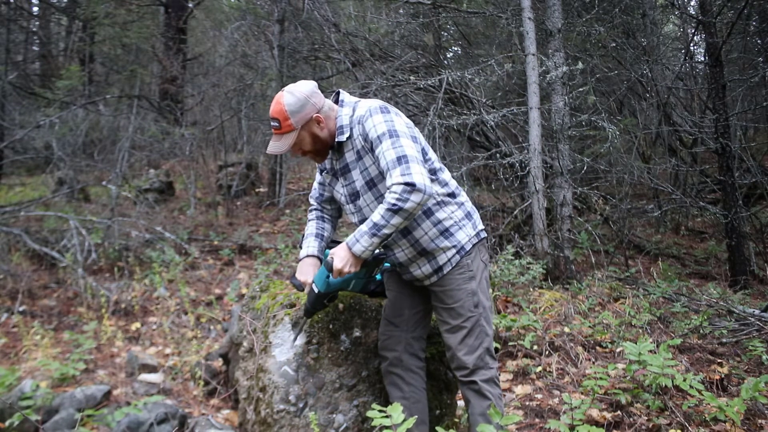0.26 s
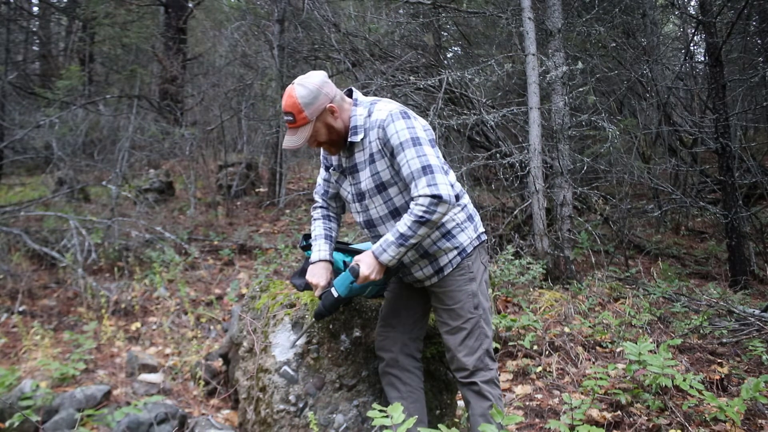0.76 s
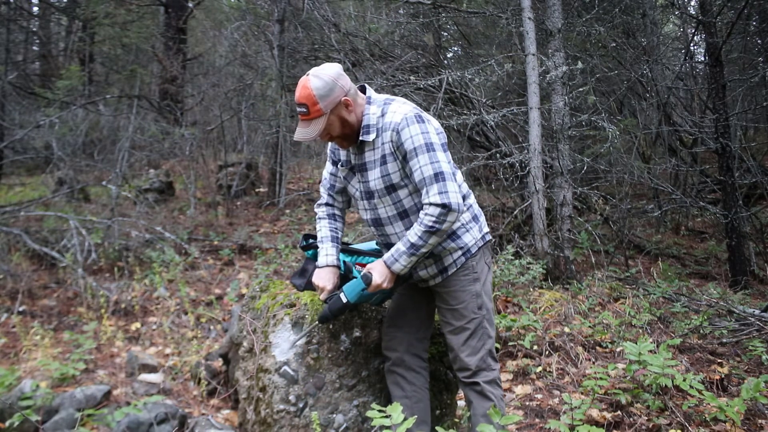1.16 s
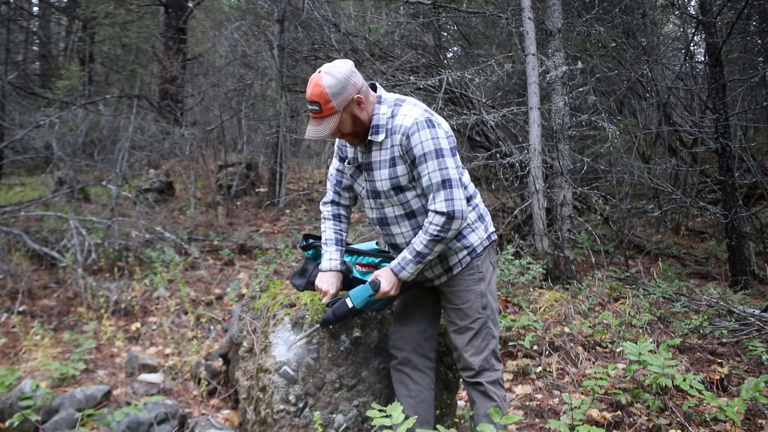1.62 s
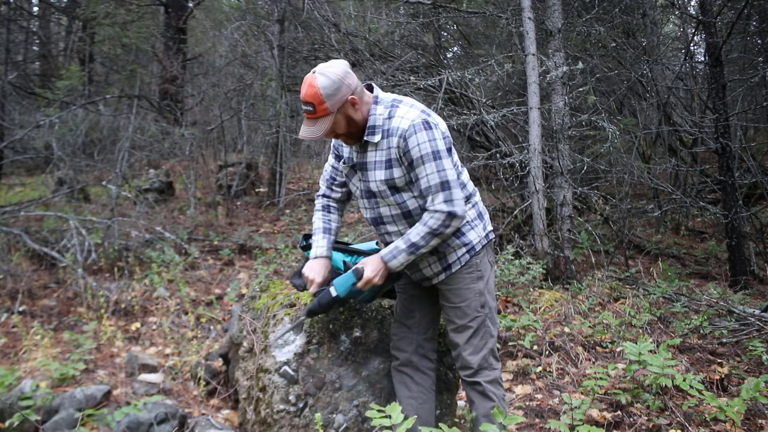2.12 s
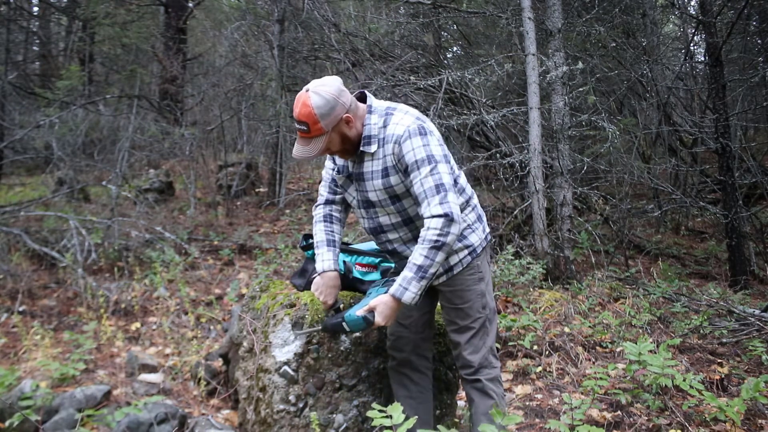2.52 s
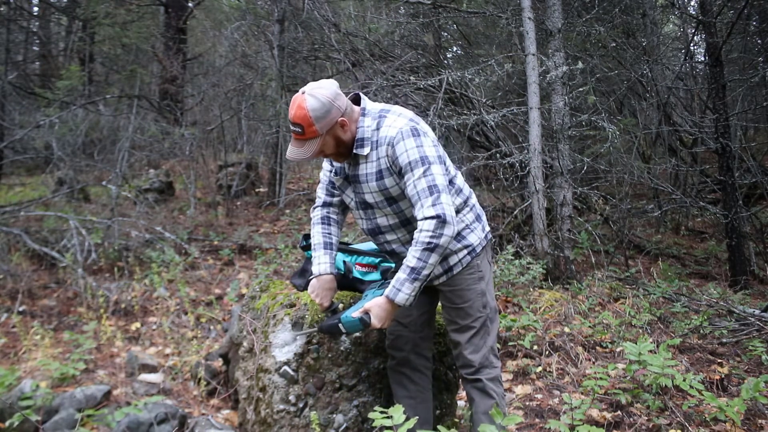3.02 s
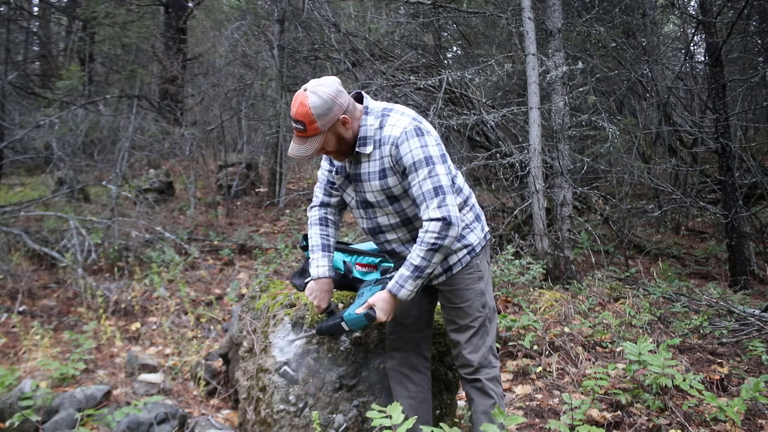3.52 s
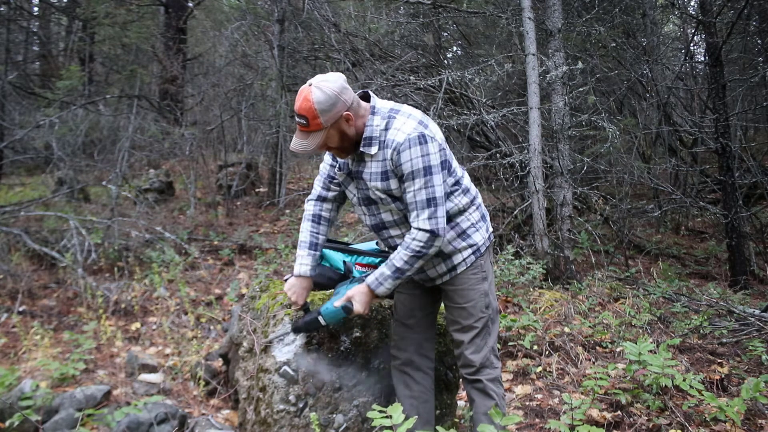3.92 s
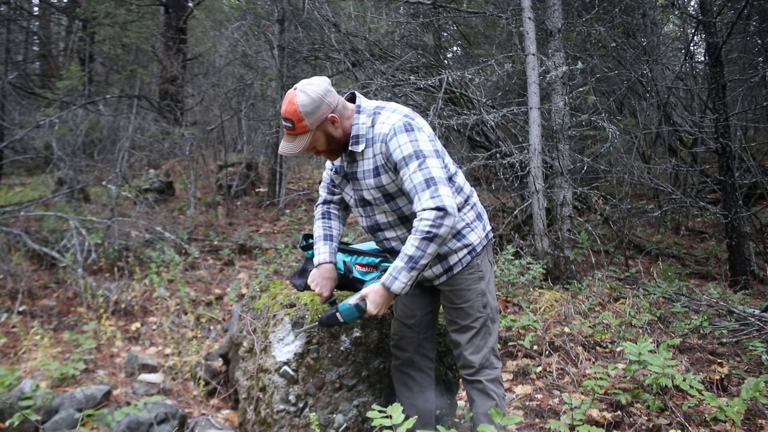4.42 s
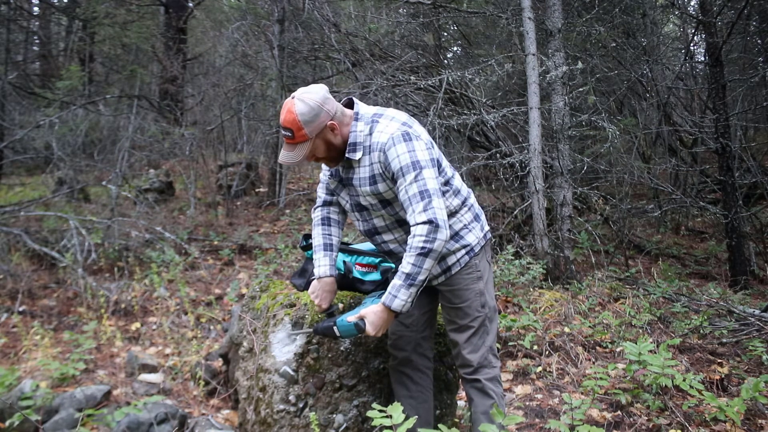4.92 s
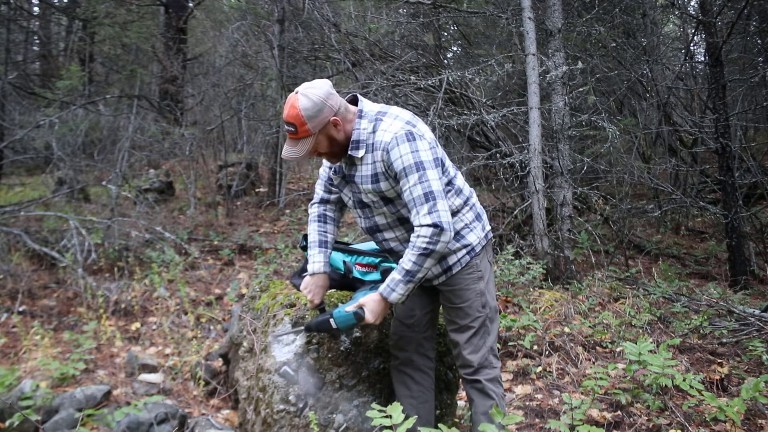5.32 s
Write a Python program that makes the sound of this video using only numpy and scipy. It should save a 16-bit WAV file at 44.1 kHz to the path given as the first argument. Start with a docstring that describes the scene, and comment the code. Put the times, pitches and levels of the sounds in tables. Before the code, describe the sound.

A cordless rotary hammer chisels old concrete in quiet woods, close to one microphone. From 0 to 1.8 s it hammers steadily, about 82 blows a second fused into a harsh buzzing rattle: housing knock strongest around 3 to 4 kHz, gritty concrete crack, thin steel ring, little deep bass. Chips snap off near the end; the freed motor races briefly and brakes by about 2.1 s. Until 2.8 s the bit taps the block, grit crunches softly and crumbs tick. The motor jerks and whines up at 2.75 to 2.9 s, and a rougher, less even burst runs 3.0 to 3.9 s, with skids and chip cracks. It brakes; taps and crumbs follow around 4.1 to 4.4 s. Spin-up with piston clatter from 4.4 s leads to a last burst, 4.8 to 5.4 s, then the motor runs down. A thin tree echo and faint steady air remain.

```python
"""A cordless rotary hammer chisels old concrete in the woods, close to the microphone, in three bursts.
A striker hits the pressed-home bit 82 times a second: blows thump the housing, crack the concrete, ring the steel.
After the first and second burst the motor brakes, the bit taps the block, grit crunches and crumbs fall.
Then the motor spins up again, its frame whining and its piston clattering twice a turn, and a burst follows.
Behind it all lie a thin echo from the trunks, further off, and still forest air, both made of shaped noise."""
import sys
import numpy as np
from scipy import signal
from scipy.fft import rfft, irfft
from scipy.io import wavfile

SR = 44100
rng = np.random.default_rng(int(sys.argv[2]) if len(sys.argv) > 2 else 0)


def waveform_to_disk(signal):
    """Save audio, clipped to [-1, 1], as 16-bit WAV at the path in sys.argv[1]."""
    frames = np.transpose(np.atleast_2d(signal))
    scaled = np.clip(frames, -1, 1) * 32767
    samples = np.round(scaled).astype(np.int16)
    wavfile.write(sys.argv[1], SR, samples)


N = 245195
T = np.arange(N) / SR

# spells of hammering: (first blow [s], last blow [s], blow rate [1/s], share of each blow that is new [0-1])
SPELLS = [(0.0058, 1.812, 82.06, .18), (3.0095, 3.868, 81.97, .42), (4.7897, 5.378, 81.95, .42)]
# colour of the tool's barrel: (frequency [Hz], level [dB])
BARREL = [(1500, -31), (2500, -25), (2850, -5), (3150, 0), (3400, 1.5), (3750, 4), (4000, -5), (4350, -25),
          (5500, -27.5)]
# ringing modes of the steel chisel: (frequency [Hz], width [Hz], level [dB])
STEEL_MODES = [(11400, 410, -2.5), (12060, 500, -5), (12810, 200, 6), (13250, 700, -4), (14300, 600, -3.5)]
# colour of contact with the concrete: (frequency [Hz], level [dB])
STONE = [(60, -58), (200, -14), (500, 0), (900, 2), (1700, 4.5), (3400, 4), (4500, -9.5), (8000, -15),
         (16000, -23)]


def gain_of(db):
    """Amplitude factor of a level in dB."""
    return 10 ** (np.asarray(db) / 20)


def evened(x):
    """Scales to rms 1."""
    return x / np.sqrt(np.mean(x ** 2) + 1e-20)


def read(points, hz):
    """A spectrum, joined on a log-frequency axis."""
    f, value = np.transpose(points)
    return np.interp(np.log(hz + 1), np.log(f + 1), value)


def curve(rows, column=1):
    """One column of a control table at every sample."""
    rows = np.asarray(rows)
    return np.interp(T, rows[:, 0], rows[:, column])


def add(mix, s, sound):
    """Mixes a sound in at time s."""
    part = mix[max(round(s * SR), 0):][:len(sound)]
    part += sound[:len(part)]


def colour(x, spectrum, size=2048):
    """Causal (minimum-phase) filter of unit energy with the given spectrum."""
    level_db = read(spectrum, abs(np.fft.fftfreq(size, 1 / SR)))
    log_gain = np.log(gain_of(np.maximum(level_db, -100)))
    response = np.fft.ifft(np.exp(np.conj(signal.hilbert(log_gain)))).real
    # if the energy lies in the second half, time runs backwards: turn it round
    if np.sum(response[:size // 2] ** 2) <= np.sum(response[size // 2:] ** 2):
        response = np.roll(response[::-1], 1)
    return signal.oaconvolve(x, response / np.linalg.norm(response))[:len(x)]


def ring(x, modes, size=2048):
    """Damped modes of unit total energy; a wider mode dies sooner."""
    t = np.arange(size) / SR
    response = sum(gain_of(db) * np.sqrt(width) * np.exp(-np.pi * width * t) * np.cos(2 * np.pi * hz * t)
                   for hz, width, db in modes)
    lowest_hz = np.min(np.asarray(modes)[:, 0])
    response = signal.sosfilt(signal.butter(2, lowest_hz / 2, "high", fs=SR, output="sos"), response)
    return signal.oaconvolve(x, response / np.linalg.norm(response))[:len(x)]


def resonate(x, hz, width):
    """A moving resonance: shifts the curve hz down to zero, smooths, and shifts back."""
    turn = np.exp(2j * np.pi * np.cumsum(hz) / SR)
    pole = np.exp(-np.pi * width / SR)
    smoothed = signal.lfilter([1], np.poly([pole, pole]), x / turn + 1e-18)  # two poles: steep skirts
    return (turn * smoothed).real


def waver(per_s):
    """Slow chance of rms 1, with per_s random knots a second."""
    knots = np.arange(N // 64) / per_s
    return evened(np.interp(T, knots, rng.standard_normal(len(knots))))


def burst(t, rise, decay):
    """A quick rise and an exponential fall."""
    t = np.maximum(t, 0)
    return (1 - np.exp(-(t / rise) ** 2)) * np.exp(-t / decay)


def blows(times, sizes, shape, fresh, memory, click=0):
    """A clean click, then a rattle that slowly drifts from blow to blow, plus a part that is new each time."""
    drift, new = rng.standard_normal((len(times), 2, len(shape))).swapaxes(0, 1)
    keep = np.exp(-1 / memory)  # memory in blows
    for k in range(1, len(times)):
        drift[k] = keep * drift[k - 1] + np.sqrt(1 - keep ** 2) * drift[k]
    fresh = np.clip(fresh, 0, 1)
    strike = click * np.linalg.norm(shape) * (np.arange(len(shape)) == np.argmax(shape))
    rattles = shape * (np.sqrt(1 - fresh) * drift + np.sqrt(fresh) * new) - strike
    # flattened to drive all frequencies about equally: the colour comes from what is shaken
    z = rfft(rattles, 2 * len(shape))
    rattles = irfft(z / (abs(z) + 1e-9) ** .7)[:, :len(shape)]
    out = np.zeros(N)
    for s, size, rattle in zip(times, sizes, rattles):
        add(out, s, size * rattle)
    return evened(out) * np.sqrt((times[-1] - times[0]) / T[-1])  # about rms 1 within the spell


def seating(spell):
    """0 while the bit is free, 1 while it is pressed home."""
    first, last = spell[:2]
    return np.clip(np.minimum(T - first + 0.022, last - T) / 0.036, 0, 1)


def thump(turns, orders, unsteady_db):
    """The low orders of the blow rate, radiated by housing and block; they crest just after each strike."""
    total = 0
    for order, db in orders:
        phase = 2 * np.pi * order * (turns - .07) + .7 * rng.standard_normal()
        total = total + gain_of(db + unsteady_db * waver(7)) * np.cos(phase)
    return evened(total)


def hammer(spell, force, spot, orders, size=900):
    """Striker on bit: the housing knocks and rebounds, the concrete cracks, the steel rings."""
    # the chisel springs loose and skids: (time [s], extra steel ring [dB], length [s], skid [0-1])
    slip_rows = [(1.785, 9, .03, 1), (3.27, 5, .03, .8), (3.54, 5, .022, .9), (3.79, 7, .045, .7),
                 (4.89, 5, .02, .4), (4.954, 12, .02, .4), (5.30, 13, .03, .8)]
    # colour of the casing: (frequency [Hz], level [dB])
    casing_spectrum = [(300, -48), (700, -25), (1300, -11), (1650, -3), (2000, -5), (2300, 2), (2550, -1),
                       (2720, 2), (3000, -5), (4000, -33.5)]
    # modes of the casing: (frequency [Hz], width [Hz], level [dB])
    casing_modes = [(1635, 110, 2.5), (1830, 150, -3), (2230, 130, -3), (2715, 100, -1)]
    # the seated bit's second resonance: (time [s], frequency [Hz], level [dB])
    lower_mode = [(.3, 2120, -5), (.45, 2330, -8), (.75, 2300, 0), (1.3, 2270, -2), (1.6, 2260, -7),
                  (3.1, 2380, -5)]
    # bright modes of the barrel: (frequency [Hz], width [Hz], level [dB])
    bright_modes = [(3790, 280, 0), (3600, 350, -7)]
    # colour of the cracking concrete: (frequency [Hz], level [dB])
    crack_spectrum = [(2500, -46), (4300, 3.5), (5500, -0.5), (6300, -1), (7300, -2.5), (8150, 1),
                      (9300, -9), (11300, -10.5), (14500, -17.5), (16000, -11)]
    # colour of the rumbling block: (frequency [Hz], level [dB])
    block_spectrum = [(100, -35.5), (300, -11.5), (600, -0.5), (1000, 0.5), (1500, -3), (2500, -32.5)]
    seat_width_hz = 330
    # the tip skids as it is pressed home and lifted: the block rumbles and the casing shakes more
    settle_s, lift_s, skid_tumble_db, skid_casing_db = .08, .06, 8, 0.8
    skid_jitter_s = .0012  # the striker loses its beat as the bit lifts
    skid_wobble, unsteady_db = .05, 4  # a loose tip shifts the thump's timing [cycles], varies its orders [dB]

    first, last, rate, fresh = spell
    casing_db, thump_db, tumble_db = spot
    beats, t = np.arange(first, last, 1 / rate), np.arange(size) / SR
    strength, bite, seat, flight = rng.standard_normal((4, len(beats)))

    slips = [(db, share, np.exp(-((T - s) / length) ** 2)) for s, db, length, share in slip_rows]
    loose_db = sum(db * slip for db, _, slip in slips)
    slipping = sum(share * slip for _, share, slip in slips)
    settling = np.exp(-abs(T - first) / settle_s)
    skid = np.clip(2 * fresh * settling + np.exp(-abs(T - last) / lift_s) + slipping, 0, 1)

    # load makes the crank sag, lag and catch up, and the striker's flight time varies a little
    lag = fresh * (.0007 * waver(11) - .004 * settling)
    jitter_s = .0002 * fresh + skid_jitter_s * np.exp((beats - last) / lift_s)
    times = beats + np.interp(beats, T, lag) + jitter_s * flight
    sizes = gain_of(2.8 * fresh * strength)

    # the piston turns round half a cycle after the strike
    rebound = burst(t - .5 / rate, 0.00071, 0.0019)
    knock = burst(t, .00045, .0013) + .11 * burst(t, .002, .012) + (.1 + .3 * fresh) * rebound
    snap = burst(t, .0003, 0.00092) + 0.207 * burst(t, 0.00085, 0.018) + 0.023 * rebound
    ping = burst(t, 0.00064, 0.0035) + 0.048 * burst(t, .001, 0.0057)

    shake = blows(times, sizes, knock, fresh, memory=35, click=.45)
    casing = gain_of(-4.0) * colour(shake, casing_spectrum) + gain_of(-9.0) * ring(shake, casing_modes)

    jolt = blows(times, sizes, knock, fresh, memory=46, click=0.25)
    upper = resonate(jolt, curve(force, 3), seat_width_hz)
    lower = gain_of(curve(lower_mode, 2)) * resonate(jolt, curve(lower_mode), seat_width_hz)
    rattle = blows(times, sizes, knock, fresh, memory=35, click=.6)
    seated = np.std(rattle) * evened(upper + lower)
    barrel = gain_of(-2.6) * colour(rattle, BARREL) + gain_of(-4.0) * seated

    bright = blows(times, sizes, knock, fresh, memory=30, click=.6)
    bright = colour(ring(bright, bright_modes), BARREL)
    bright *= np.std(rattle) / np.std(bright)

    crack = blows(times, sizes * gain_of(1.4 * bite), snap, 2 * fresh, memory=17, click=0.35)
    crack = colour(crack, crack_spectrum)
    steel = blows(times, gain_of((2 + 4 * fresh) * seat), ping, fresh, memory=9, click=.6)
    steel = ring(steel, STEEL_MODES)

    tumble = blows(times, sizes, knock, fresh=1, memory=60, click=.2)
    tumble = gain_of(tumble_db + skid_tumble_db * skid) * np.sqrt(fresh) * colour(tumble, block_spectrum)
    turns = rate * (T - first - lag) + skid_wobble * (skid + fresh ** 2) * waver(35)
    steady = seating(spell) * (1 - .8 * skid) * thump(turns, orders, 1 + unsteady_db * fresh)
    body = gain_of(thump_db) * steady + tumble

    # the housing follows the force, the crack the bite, the bright ring its own level
    housing = gain_of(casing_db + skid_casing_db * skid) * casing + gain_of(-2.3) * barrel
    return (gain_of(curve(force)) * housing
            + gain_of(0.5 + curve(force, 2)) * crack
            + gain_of(curve(force, 4)) * body
            + gain_of(-2.8 + curve(force, 5)) * bright
            + gain_of(curve(force, 6) + loose_db) * steel)


def chips(size=1500):
    """A harder crack where a piece of concrete gives way: one snap over a spray of splinters."""
    # blows that break off a chip: (time [s], level [dB])
    chip_rows = [(1.723, -5), (1.785, -9), (1.861, -7), (1.869, 1), (3.044, -2), (3.241, -6), (3.266, -1),
                 (3.534, -2), (3.765, -8), (3.790, -8), (4.788, -5), (4.80, -5), (4.826, -5), (4.849, -2),
                 (5.253, -5)]
    # colour of a breaking chip: (frequency [Hz], level [dB])
    chip_spectrum = [(150, -35), (500, -11), (1200, -4), (2000, 2), (2700, 3), (3800, 1), (5000, -7),
                     (8000, -14), (16000, -22)]
    snap_db = 7  # the snap, against its splinters
    t, out = np.arange(size) / SR, np.zeros(N)
    for s, db in chip_rows:
        add(out, s + .0012, gain_of(db) * burst(t, .0004, .0013) * rng.standard_normal(size))
        add(out, s + .0016, gain_of([db + snap_db]))  # a single-sample click
    concrete = gain_of(-9.0) * colour(out, chip_spectrum)
    return concrete + gain_of(-15) * colour(out, BARREL) + gain_of(-23.0) * ring(out, STEEL_MODES)


def drive():
    """Crank speed, gear level and share of rubbing: the motor overshoots, settles, races on lifting and brakes."""
    # pulls of the trigger: (pulled [s], released [s], running level [dB], change while hammering [dB],
    # gear rub while braking [0-1])
    runs = [(-1.0, 1.94, -26.0, -10, .05), (2.746, 3.88, -25.7, -4.3, .5), (4.406, 5.408, -25.0, -4.3, .03)]
    crank_hz = 82
    spin_up_s, overshoot, overshoot_s, brake_s = .14, .06, .1, .135
    clatter_ends_s, clatter_fade_s = .1, .03  # after the release the piston soon stops clacking
    lift_race, race_rise_s, race_s = .13, .025, .065  # freed of its load, the motor races for a moment
    # gear noise grows with speed, and with the starting torque
    louder_db_per_decade, surge_db, surge_s = 88, 3.8, .35

    speed, level, rubbing = np.zeros((3, N))
    load = sum(seating(spell) for spell in SPELLS)
    race = 1 + lift_race * sum(burst(T - spell[1], race_rise_s, race_s) for spell in SPELLS)
    for pulled, released, db, load_db, brake_rub in runs:
        running, braking = np.maximum(T - pulled - spin_up_s, 0), np.maximum(T - released, 0)
        pace = np.clip((T - pulled) / spin_up_s, 0, 1) * (1 + overshoot * np.exp(-running / overshoot_s))
        brake = np.clip(1 - (braking / brake_s) ** 2, 0, 1)
        engaged = np.clip((clatter_ends_s - braking) / clatter_fade_s, 0, 1) ** 2
        speed += crank_hz * pace * brake * race
        gear_db = db + surge_db * np.exp(-running / surge_s) + load_db * load
        level += pace ** (louder_db_per_decade / 20) * brake * engaged * gain_of(gear_db)
        starting_rub = np.clip((.94 - pace) / .29, 0, 1)
        stopping_rub = brake_rub * np.minimum(4 * (1 - brake), 1)
        rubbing += (pace * engaged > 0) * (starting_rub + stopping_rub)
    return speed, level, np.clip(rubbing, 0, 1)


def hum(speed, torque_db):
    """Clean tones of the turning crank and gears; the mesh sings under high torque."""
    # tones of the running gear: (multiple of the crank rate, level [dB])
    tones = [(3, -16), (4, -4), (5, -6), (6, 1), (7, 0), (8, -4), (9, -6), (11, -5), (13, -2), (18, 2),
             (20, 4), (21, 3), (27, 3), (31, 5)]
    mesh_order, mesh_db, mesh_per_torque = 10, -25, 1.4  # multiple of the crank rate, dB, dB per dB
    turns = np.cumsum(speed * (1 + .003 * waver(25))) / SR
    orders = sum(gain_of(db + 2 * waver(9)) * np.cos(2 * np.pi * (k * turns + rng.random())) for k, db in tones)
    mesh = gain_of(mesh_db + mesh_per_torque * torque_db) * np.cos(2 * np.pi * mesh_order * turns)
    return gain_of(-18.5) * evened(orders) + mesh


def motor(size=600):
    """The piston clacks at both ends of its travel through the gearbox; at low speed the frame whines."""
    # gears take up slack as the motor starts: (time [s], ring of the frame [dB], knock of the gearbox [dB])
    jerks = [(2.85, -21, -33), (2.866, -20, -17), (4.453, -41, -60), (4.479, -29, -60), (4.514, -33, -29),
             (4.543, -22, -14), (4.549, -27, -16)]
    # modes of the motor frame: (frequency [Hz], width [Hz], level [dB])
    whine_modes = [(1766, 120, -4), (1260, 105, -16.5), (2460, 610, -8.5)]
    # colour of the gearbox: (frequency [Hz], level [dB])
    gear_spectrum = [(150, -36), (330, -13.5), (430, -14), (580, -8), (700, -10), (850, -8), (1000, -8),
                     (1300, -3.5), (1650, 3), (2050, -1), (2550, 5), (3050, 2), (3800, 4.5), (4400, -9),
                     (8000, -12.5), (10000, -20), (16000, -26)]
    speed, level, rubbing = drive()
    t = np.arange(size) / SR
    half_turns = np.floor(2 * np.cumsum(speed) / SR)
    strokes = T[np.flatnonzero(np.diff(half_turns))]
    clack = burst(t, .0006, .0015) + .29 * burst(t, .001, .012)
    clatter = 0
    for times in (strokes[::2], strokes[1::2]):  # the two ends of the travel
        sizes = gain_of(.9 * rng.standard_normal(len(times)))
        clatter = clatter + blows(times, sizes, clack, fresh=.33, memory=14, click=.2)
    # rubbing gears drive the frame at low speed, the piston at full speed, most of all under high torque
    shaking = np.sqrt(1 - rubbing) * evened(clatter) + np.sqrt(rubbing) * rng.standard_normal(N)
    torque_db = np.clip(20 * np.log10(level + 1e-9) + 26, 0, 12)  # read from the gear level
    slack = sum(gain_of(db) * burst(T - s, .002, .007) for s, db, _ in jerks) * rng.standard_normal(N)
    knocks = sum(gain_of(db) * burst(T - s, .001, .003) for s, _, db in jerks) * rng.standard_normal(N)
    whine = level * gain_of(-13.0 + 11.8 * rubbing + 0.65 * torque_db) * ring(shaking, whine_modes)
    whine = whine + ring(slack, whine_modes)
    whine = signal.sosfilt(signal.butter(2, 3500, fs=SR, output="sos"), whine)
    gears = gain_of(-3.0 - 12.0 * rubbing) * colour(shaking, gear_spectrum)
    gears = gears + (1 - rubbing) * hum(speed, torque_db)
    return level * gears + colour(knocks, gear_spectrum) + whine


def taps(size=6000):
    """The bit knocks on the block and rattles on in its chuck."""
    # taps of the bit: (time [s], level [dB], treble [dB], ring time t60 [s])
    tap_rows = [(2.177, -42, 3, .074), (2.191, -37, 10, .035), (2.286, -35, 1, .04), (2.374, -47, -4, .06),
                (2.393, -48, -8, .06), (2.415, -51, -4, .15), (2.474, -41, -3, .04), (2.71, -47, -2, .05),
                (2.731, -46, -4, .06), (4.191, -39, -3, .03), (4.2, -35, -16, .03), (4.213, -42, -6, .035)]
    # modes of bit against block: (frequency [Hz], width [Hz], level [dB])
    knock_modes = [(520, 90, -3), (850, 90, 0), (2300, 160, -2), (3100, 160, 0)]
    chuck_db, chuck_s = -11, .016  # rattle of the loose bit, against its tap
    t, out = np.arange(size) / SR, np.zeros(N)
    for s, db, treble_db, t60 in tap_rows:
        shape = gain_of(-60 * t / max(t60, .005)) + 1.1 * burst(t, 0.0003, 0.0008)
        contact = gain_of(db) * shape * rng.standard_normal(size)
        rattle = gain_of(db + chuck_db) * burst(t, .004, chuck_s) * rng.standard_normal(size)
        stone = colour(colour(contact, STONE), [(2500, 0), (7000, treble_db)])
        add(out, s, stone + colour(rattle, BARREL) + gain_of(-8) * ring(contact, knock_modes))
    return gain_of(-6.0) * out


def scrape():
    """Grit crunches softly while the tool is dragged to a new spot: steady rubbing and chance grains."""
    # drags, ever more firm: (start [s], end [s], final level [dB])
    drags = [(2.08, 2.85, -53.2), (3.98, 4.47, -56.5)]
    # colour of the rubbing: (frequency [Hz], level [dB])
    grit_spectrum = [(88, -16), (150, -11), (414, -7.5), (514, -11), (555, -3), (601, -5), (1310, -9),
                     (5910, -43), (12700, -45), (16000, -45)]
    swell_db, fade_s = 10.5, .04
    grains = gain_of(3.5 * np.minimum(rng.exponential(1, N), 5)) * (rng.random(N) < 500 / SR)  # 500 a second
    rubbing = colour(rng.standard_normal(N), grit_spectrum) + 0.47 * colour(evened(grains), STONE)
    level = 0
    for start, end, db in drags:
        swell = gain_of(db - swell_db * np.clip((end - T) / (end - start), 0, 1))
        level = level + swell * np.clip(1 + np.minimum(T - start, end - T) / fade_s, 0, 1)
    return level * rubbing


def crumbs(size=900):
    """Crumbs of concrete tick on dry leaves: very short bursts of noise."""
    # falling crumbs: (time [s], level [dB])
    crumb_rows = [(2.107, -51), (2.2234, -46), (2.666, -49), (2.703, -46), (2.748, -47), (2.77, -52),
                  (4.09, -48), (4.13, -54), (4.17, -49), (4.263, -50), (4.2996, -47), (4.318, -47),
                  (4.379, -53)]
    # colour of a tick: (frequency [Hz], level [dB])
    tick_spectrum = [(800, -25), (2800, -2), (5000, 0), (8500, -1), (12000, -7), (16000, -13)]
    t, out = np.arange(size) / SR, np.zeros(N)
    for s, db in crumb_rows:
        add(out, s, gain_of(db) * burst(t, .0002, decay=.0016) * rng.standard_normal(size))
    return gain_of(-4.0) * colour(out, tick_spectrum)


def woods(x):
    """Trunks scatter a thin, dying echo: sparse noise whose decay depends on frequency."""
    # how long the woods ring: (frequency [Hz], t60 [s])
    decay_times = [(200, 0.94), (1500, 0.37), (4000, 0.4), (9000, 0.41), (13000, 0.067)]
    sparse = rng.standard_normal(SR) * (rng.random(SR) < .05)
    hz, t, z = signal.stft(sparse, SR, nperseg=256)
    decay = gain_of(-60 * t / read(decay_times, hz)[:, None])
    build_up = np.minimum(t / 0.029, 1)
    tail = signal.istft(z * decay * build_up, SR, nperseg=256)[1]
    return signal.fftconvolve(x, tail / np.linalg.norm(tail))[:N]


def forest_air():
    """Still forest air: steady, softly coloured noise."""
    # colour of the air: (frequency [Hz], level [dB])
    air_spectrum = [(12, -19), (20, -17), (86, -3.5), (182, -14.5), (434, -11.5), (3740, -16), (4300, -19),
                    (4940, -19), (6180, -25), (6720, -23.5), (10200, -24.5), (14700, -27), (16000, -48)]
    return gain_of(-62.5) * colour(rng.standard_normal(N), air_spectrum, size=8192)


def scene():
    """The tool, too small to radiate deep bass, and its echo over still forest air."""
    # how the tool is held in each spell: (time [s], force on the handle [dB], bite of the tip into the concrete [dB],
    # resonance of the seated bit [Hz], thump of the block [dB], bright ring of the barrel [dB], ring of the steel [dB])
    forces = [
        [(0.02, -25, -33, 3560, -34, -34, -39), (0.13, -25, -35, 3470, -36, -34, -36),
         (0.33, -27.5, -37, 3520, -38, -31, -40), (0.45, -28, -36, 3650, -36.5, -30, -43),
         (0.6, -27, -36, 3550, -36, -31, -46), (0.78, -27.5, -37, 3400, -39, -34, -52),
         (0.9, -26.5, -39, 3300, -41, -39, -54), (1.12, -28, -39, 3150, -39, -42, -45),
         (1.26, -26.5, -37, 3100, -34, -37, -42), (1.45, -28, -37, 3120, -35, -36, -42),
         (1.55, -28, -36, 3120, -36.5, -32, -41), (1.7, -26, -35, 3120, -36, -33, -38),
         (1.78, -27, -35, 3200, -37, -37, -39), (1.81, -30, -39, 3200, -38, -40, -44)],
        [(3.02, -25, -36, 2720, -32, -35, -40), (3.068, -23.5, -33, 2750, -32, -31, -38),
         (3.11, -27, -36, 2750, -34, -33, -40), (3.3, -26, -36, 3450, -34, -32, -38),
         (3.46, -26, -36, 3590, -34, -32, -40), (3.494, -31, -37, 3560, -36, -38, -43),
         (3.538, -25, -34, 3500, -33, -30, -39), (3.62, -26, -34, 3580, -33.5, -33, -39),
         (3.78, -27, -37, 3400, -35, -34, -42), (3.86, -30, -41, 3350, -37, -37, -50)],
        [(4.8, -24, -36, 2700, -33, -35, -40), (4.85, -24, -34, 2750, -34, -33, -37),
         (4.88, -27, -37, 3300, -35, -35, -40), (4.954, -25, -38, 3410, -35, -34, -42),
         (4.99, -26.5, -38, 3400, -37, -35, -41), (5.08, -25, -33, 3600, -35, -30, -38),
         (5.24, -26, -34, 3550, -35, -32, -39), (5.29, -27, -38, 3240, -34, -35, -43),
         (5.37, -31, -40, 3530, -38, -38, -50)],
    ]
    # how tool and block answer at each spell's spot: (casing [dB], steady thump [dB], loose rumble [dB])
    spots = [(-2.4, 0.6, 1.0), (-3.6, 0.6, -0.5), (-3.8, 0.6, -0.5)]
    # low orders in the first spell: (multiple of the blow rate, level [dB])
    first_orders = [(1, -36), (2, -27), (3, -11), (4, -11), (5, -11), (6, -17), (7, -6), (8, -3), (9, -10),
                    (10, -2), (11, -9), (12, -12), (13, -2), (14, -6), (15, -1), (16, -13), (17, -2)]
    # low orders in the second and third spells: (multiple of the blow rate, level [dB])
    later_orders = [(1, -25), (2, -17), (3, -14), (4, -8), (5, -16), (6, -10), (7, -4), (8, 1), (9, -9),
                    (10, 1), (11, -7), (12, -3), (13, -2), (14, -7), (15, -3), (16, -3), (17, -2)]
    orders = (first_orders, later_orders, later_orders)
    hammering = sum(hammer(*parts) for parts in zip(SPELLS, forces, spots, orders))
    tool = hammering + chips() + motor() + taps() + scrape() + crumbs()
    tool = signal.sosfilt(signal.butter(2, 90, "high", fs=SR, output="sos"), tool)
    return (tool + gain_of(-25.5) * woods(tool) + forest_air())[None]


def record(dry):
    """One microphone channel with a steep upper band limit."""
    edge_hz = 15900
    band = signal.firwin(511, edge_hz, window=("kaiser", 9), fs=SR)
    return signal.oaconvolve(dry, band[None], "same")


dry = scene()
out = record(dry)
waveform_to_disk(out)
```